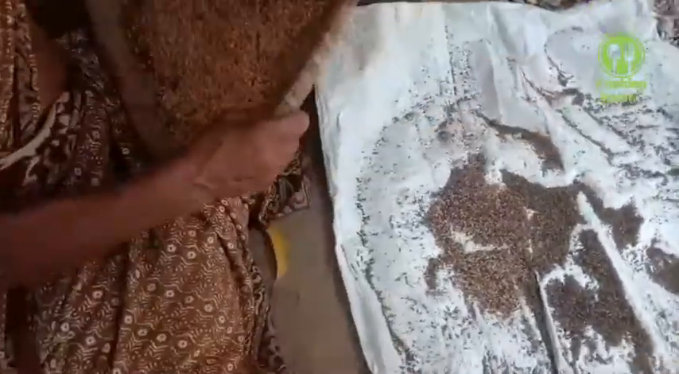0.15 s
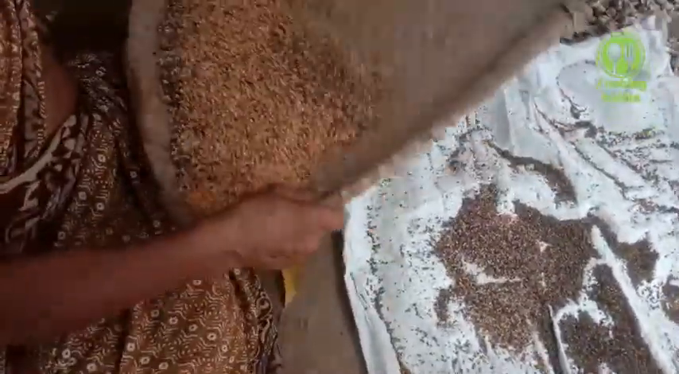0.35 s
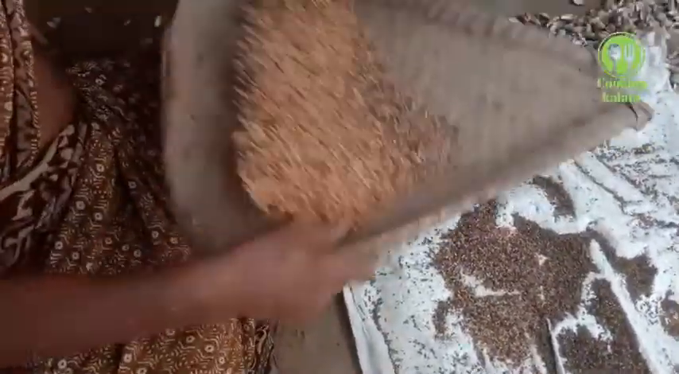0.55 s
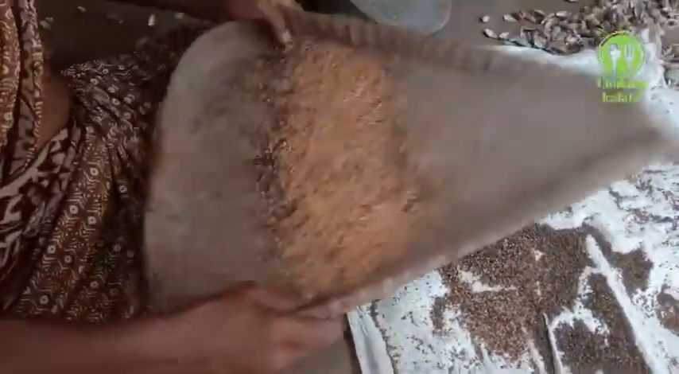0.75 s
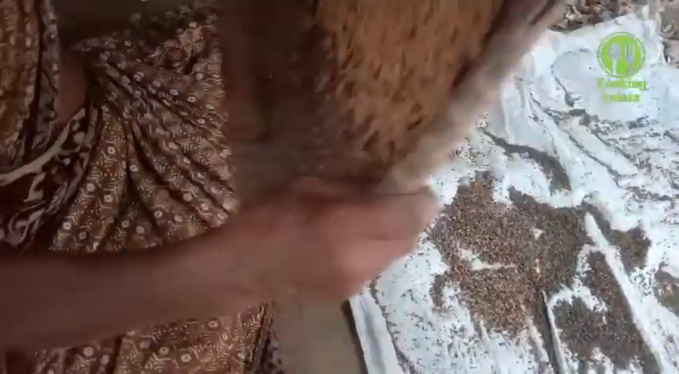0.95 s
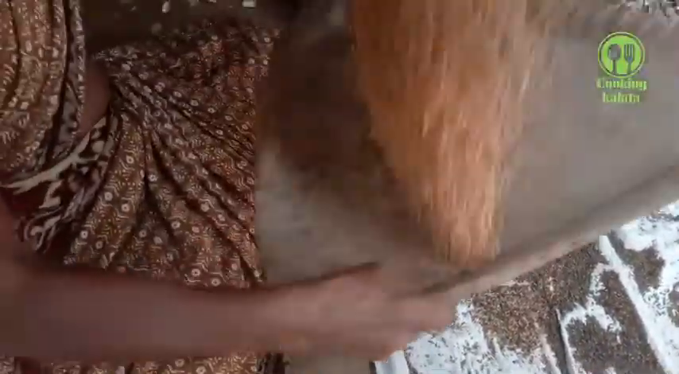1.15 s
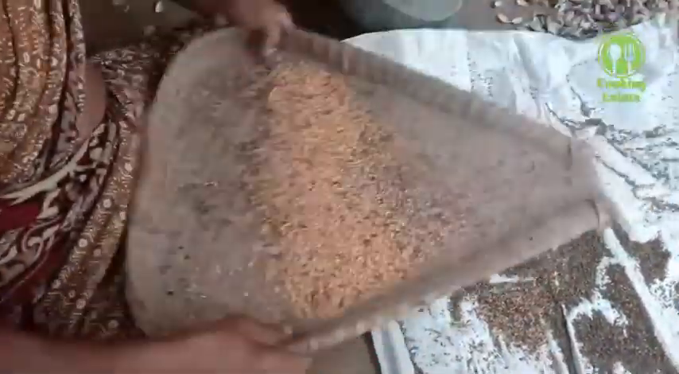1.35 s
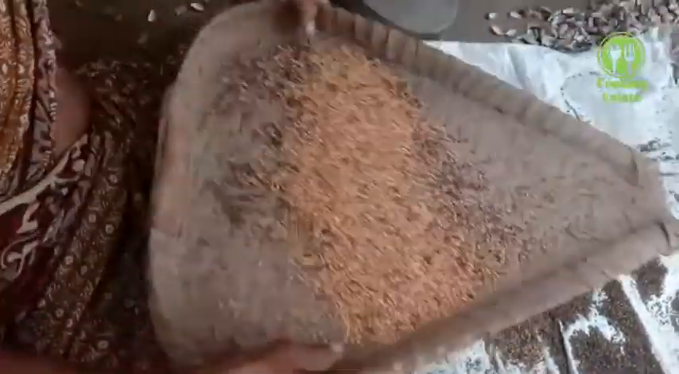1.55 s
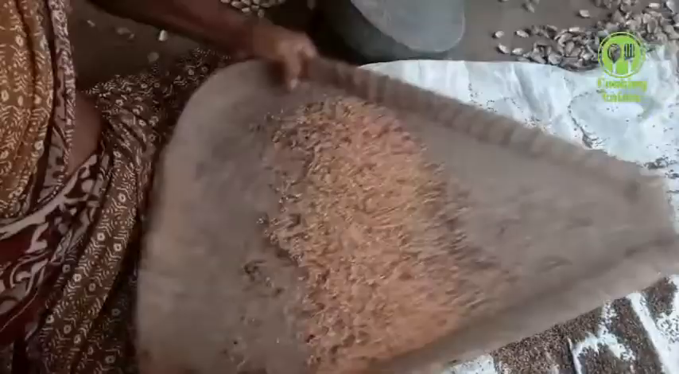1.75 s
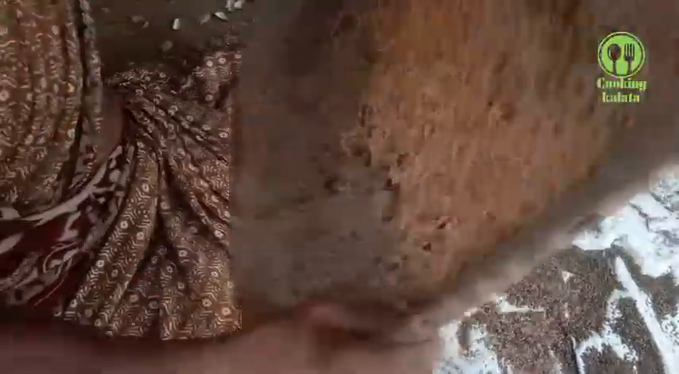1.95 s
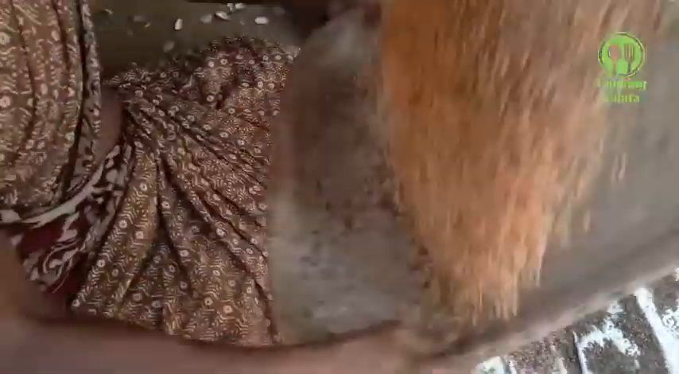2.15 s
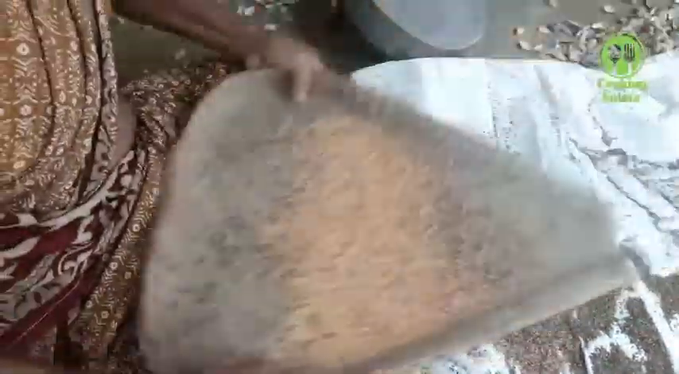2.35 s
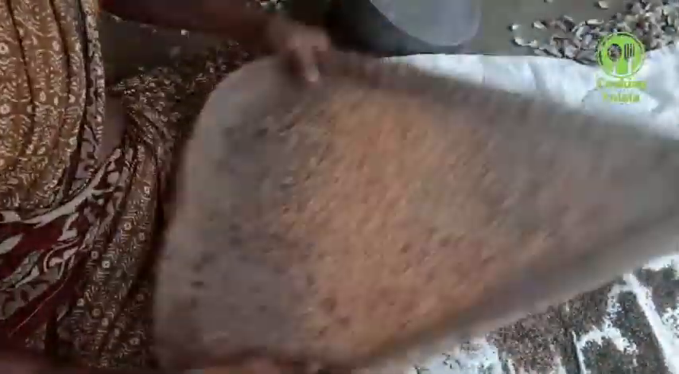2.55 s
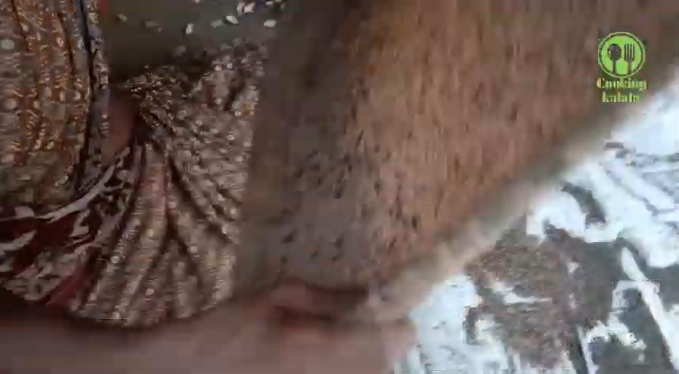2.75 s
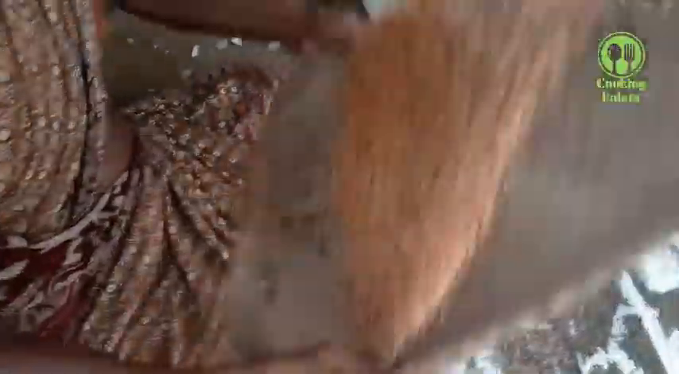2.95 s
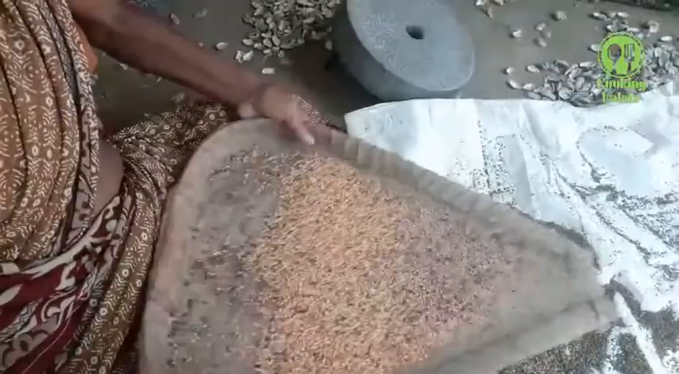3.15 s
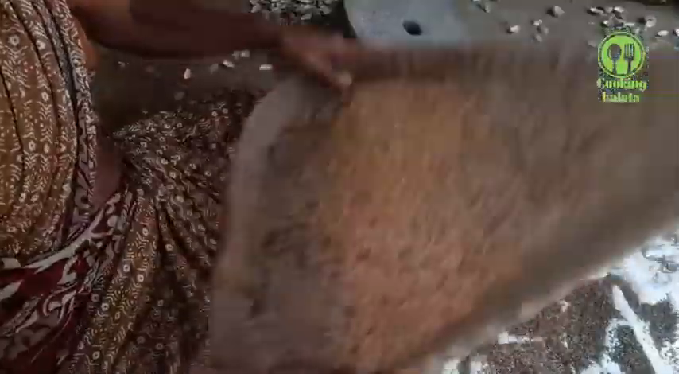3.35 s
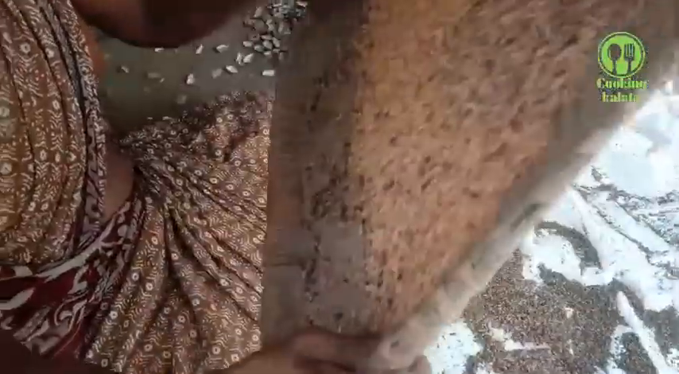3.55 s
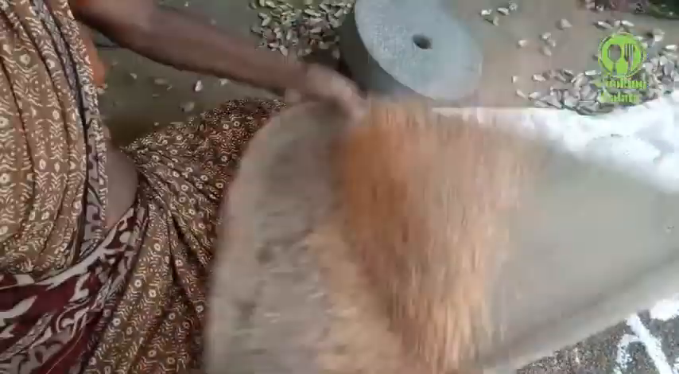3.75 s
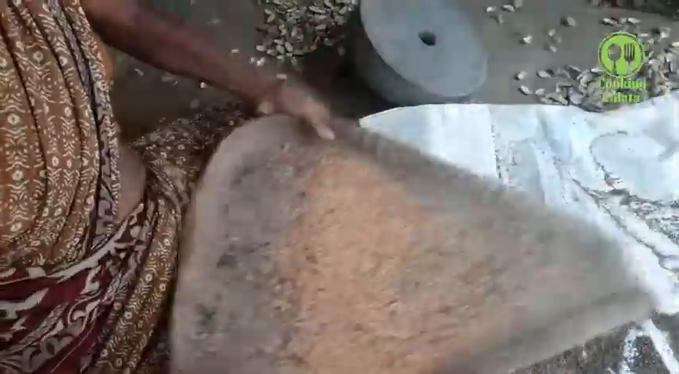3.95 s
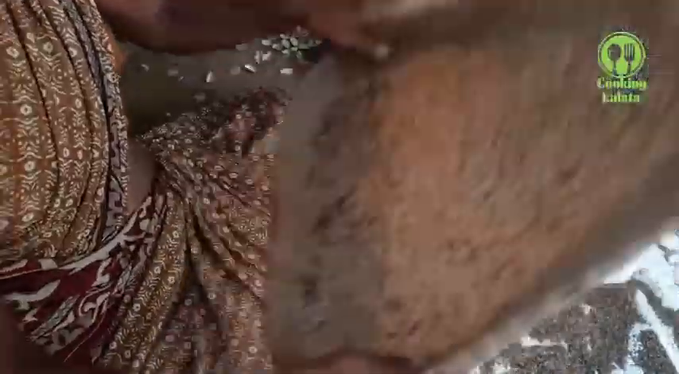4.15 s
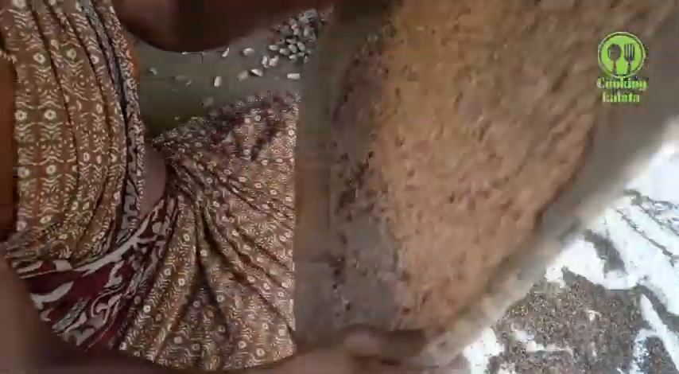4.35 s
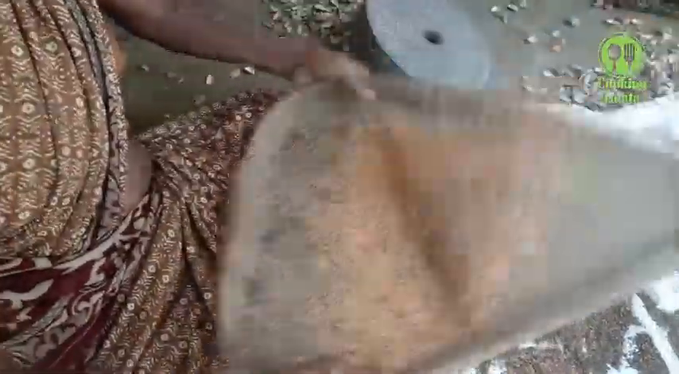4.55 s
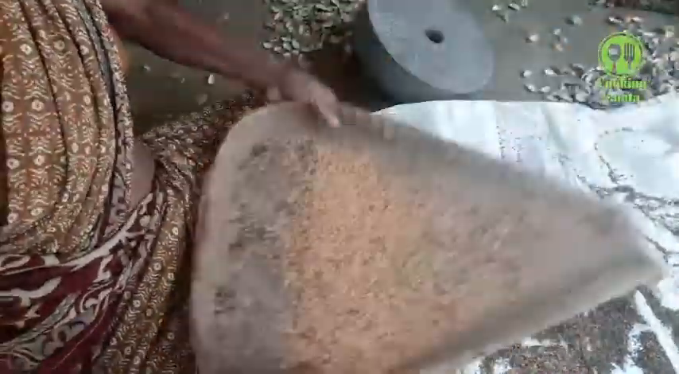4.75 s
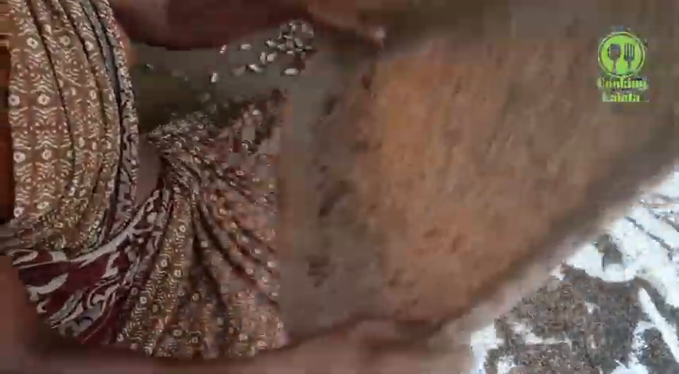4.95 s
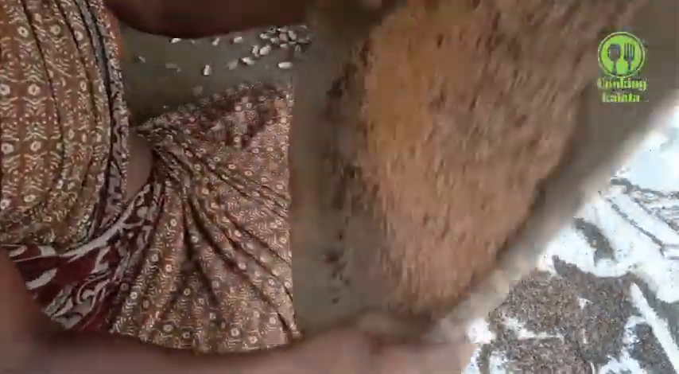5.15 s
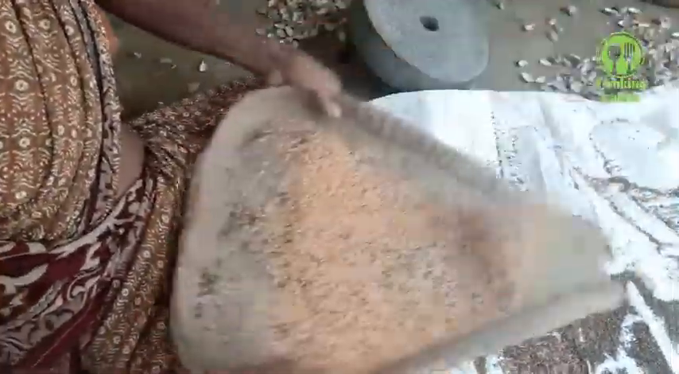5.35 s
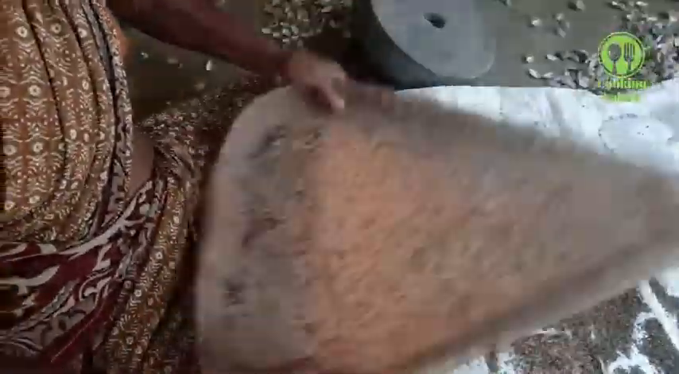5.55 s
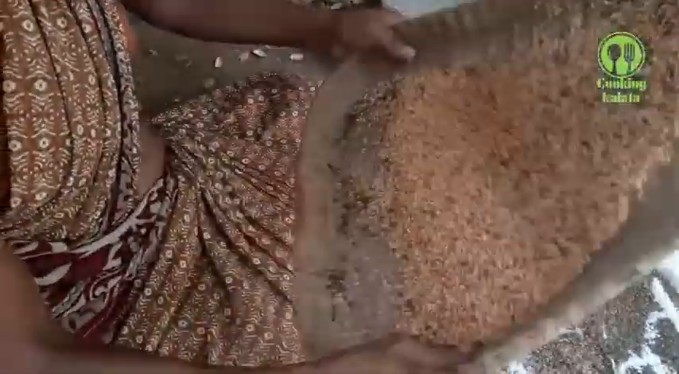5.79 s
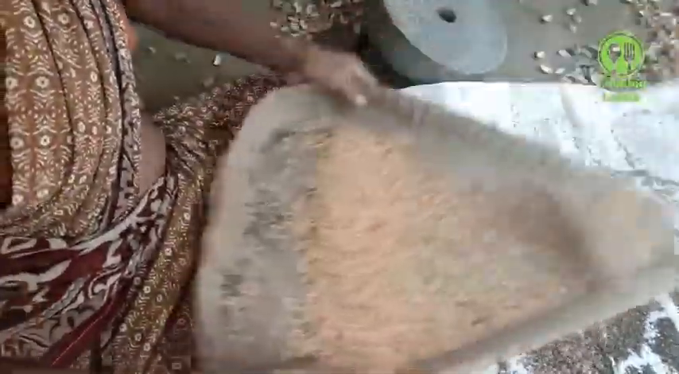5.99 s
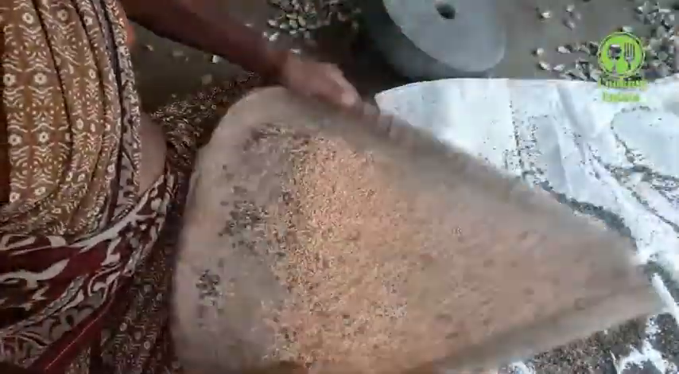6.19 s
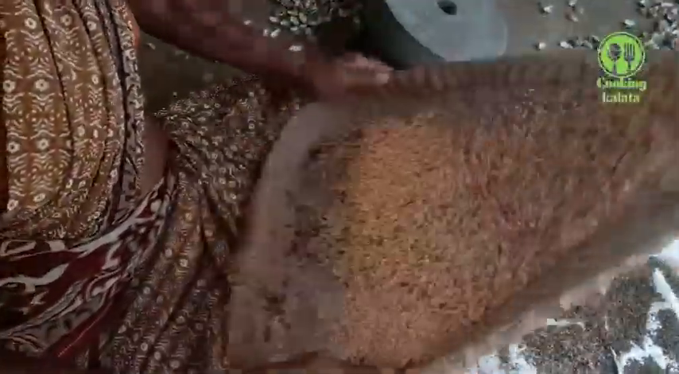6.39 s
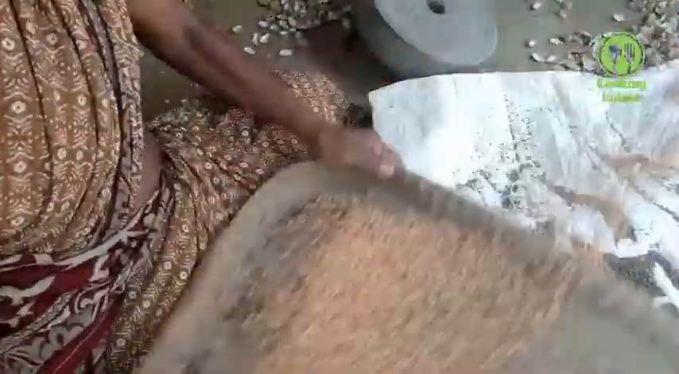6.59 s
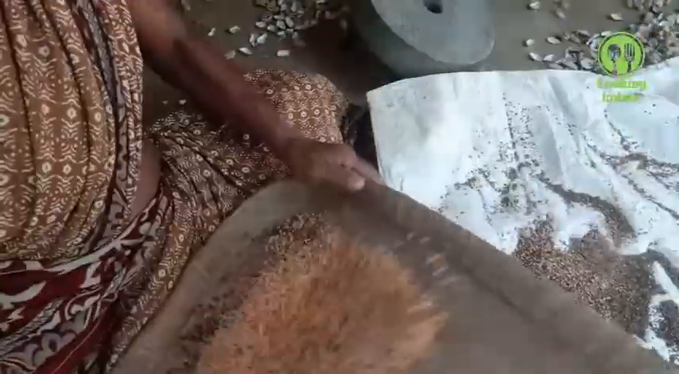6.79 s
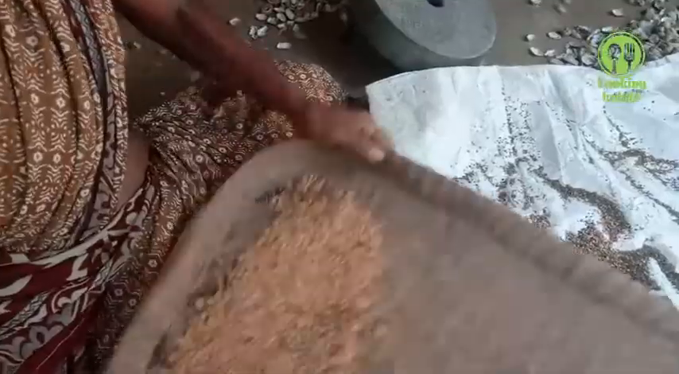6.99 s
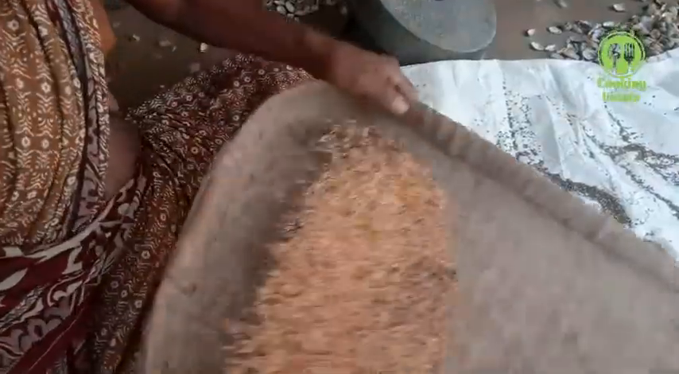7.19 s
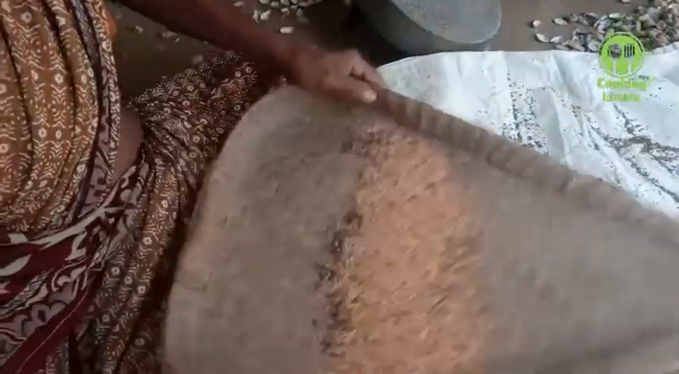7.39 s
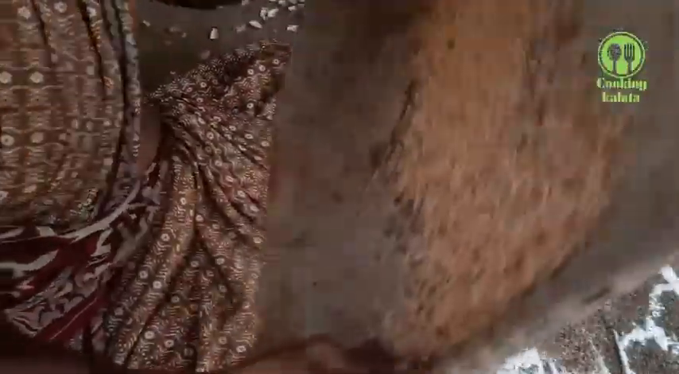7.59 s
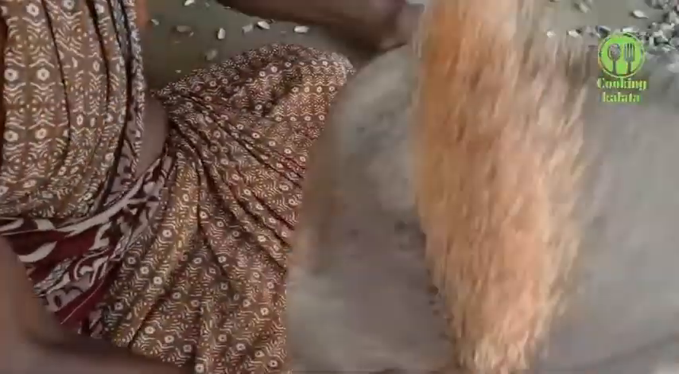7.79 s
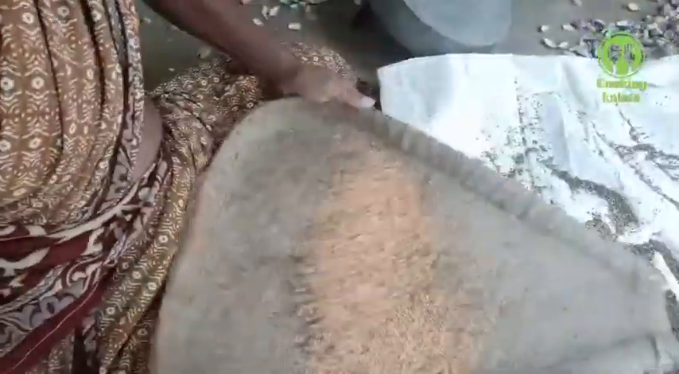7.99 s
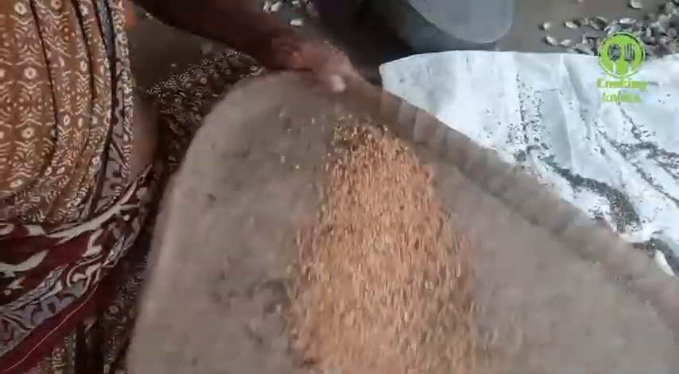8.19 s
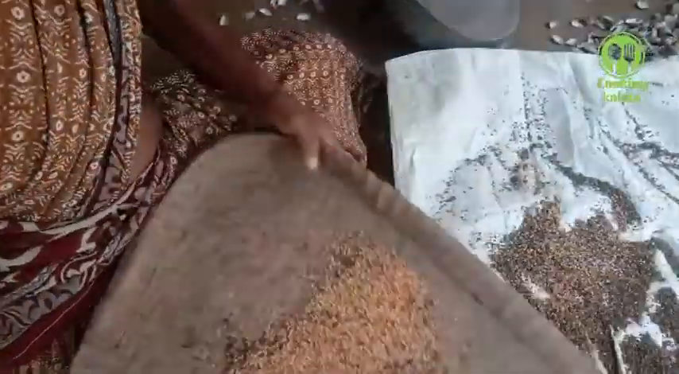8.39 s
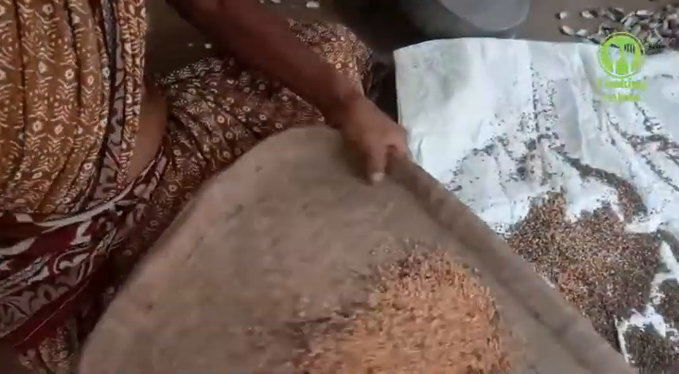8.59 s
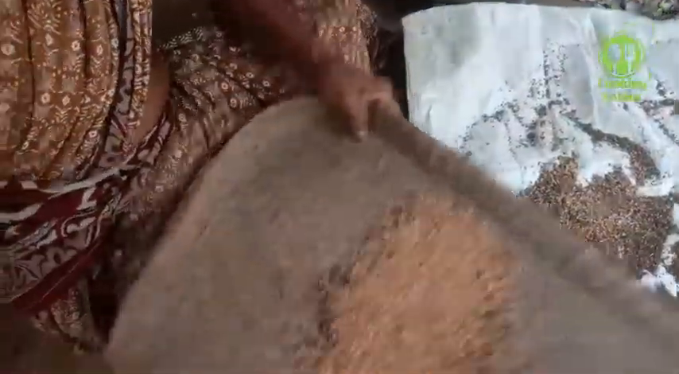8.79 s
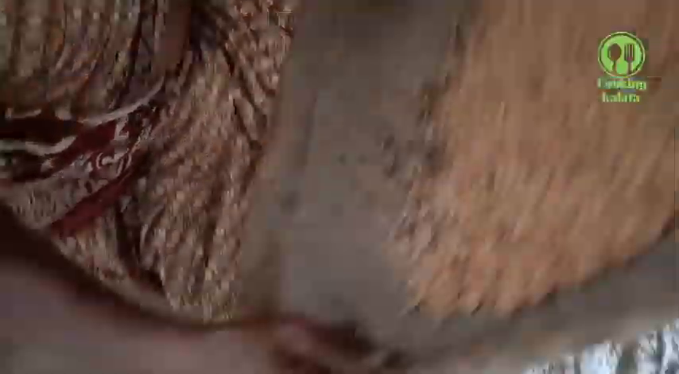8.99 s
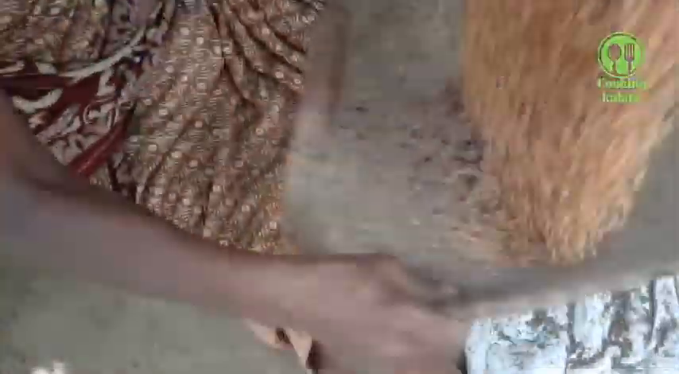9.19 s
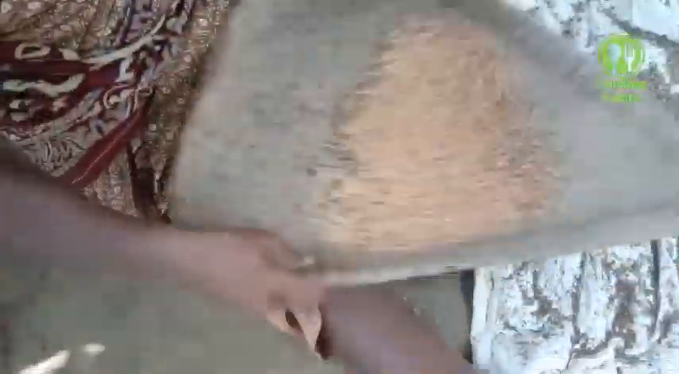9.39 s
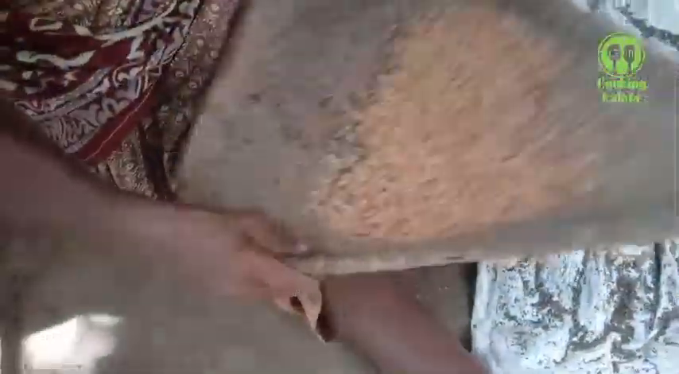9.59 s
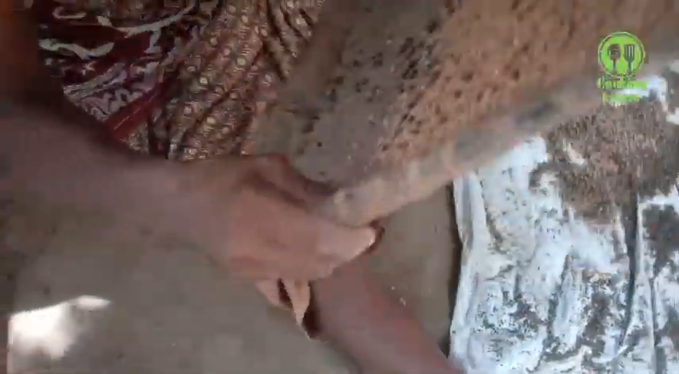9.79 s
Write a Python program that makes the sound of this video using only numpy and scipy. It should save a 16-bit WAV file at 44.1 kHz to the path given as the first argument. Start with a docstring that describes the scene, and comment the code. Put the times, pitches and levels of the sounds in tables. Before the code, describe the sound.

Grain is tossed and caught on a woven tray, making dry, rattling swishes about once or twice a second. Low bumps of a hand on the close microphone mark the opening, mostly on the right. Then four quick bursts of finger taps make the kernels jump. The tossing carries on with stray ticks and ends with two wind puffs and another bump. Very faint birds whistle far off in the quiet yard.

```python
"""A quiet yard, where grain is tossed, caught and shaken on a woven tray while birds whistle far away.
Kernels slide, click together, rattle the strips and drum on the weave, and the tray pushes the air.
Fingers tap the tray from below and make the kernels jump. Close by, a hand bumps a two-microphone
phone, mostly on the right, and wind puffs twice on the left. The left microphone is open and bright;
the right one sits behind a small opening, its port, that rings near 3.7 kHz."""
import sys
import numpy as np
from scipy import signal
from scipy.io import wavfile
from scipy.ndimage import uniform_filter1d

SR = 44100
rng = np.random.default_rng(int(sys.argv[2]) if len(sys.argv) > 2 else 0)


def generate_wav(signal):
    """Clip the signal to [-1, 1] and save it as 16-bit WAV at the path in sys.argv[1]."""
    frames = np.transpose(np.atleast_2d(signal))
    scaled = np.clip(frames, -1, 1) * 32767
    pcm = np.round(scaled).astype(np.int16)
    wavfile.write(sys.argv[1], SR, pcm)


N = 433944


def gain_of(db):
    return 10 ** (np.asarray(db) / 20)


def unit_power(x):
    return x / np.sqrt(np.mean(x ** 2) + 1e-20)


def blur(noise, bins, frames):
    """Smooth noise across pitch and time into drifting patches."""
    return unit_power(uniform_filter1d(uniform_filter1d(noise, bins, axis=0), frames, axis=1))


def values_at(table, hz):
    """Look up a table's columns at the pitches hz."""
    row_hz, *columns = np.transpose(table)
    return np.array([np.interp(np.log(hz + 1), np.log(row_hz + 1), column) for column in columns])


def add(mix, start, sound):
    part = mix[..., round(start * SR):][..., :sound.shape[-1]]
    part += sound[..., :part.shape[-1]]


def tone_filter(db):
    """Turn gains in dB, from 0 Hz to SR / 2, into a filter that rings only after a hit."""
    log = np.log(gain_of(np.maximum(db, -100)))
    log = np.concatenate([log, log[..., -2:0:-1]], -1)
    return np.fft.ifft(np.exp(log - 1j * signal.hilbert(log).imag)).real[..., :1024]


# Surges of grain. Each row: start, rise and hold in seconds, base droop over the hold in dB, base fall
# in dB per second, then levels in dB for five layers: sliding, clicking, strips, drumming, pushed air.
SURGES = [(-0.019, 0.014, 0.055, 6.5, 58.5, -46, -64.5, -54, -58, -69),
          (0.125, 0.17, 0.059, 5, 247, -43, -40, -63, -60, -72),
          (0.459, 0.14, 0.034, 0, 239.5, -40.5, -42.5, -55, -53.5, -70),
          (0.596, 0.11, 0.12, 3.5, 169, -47.5, -52.5, -65, -56.5, -87),
          (1.055, 0.12, 0.12, 5, 374, -30.0, -33.5, -45, -50.5, -66),
          (1.257, 0.084, 0.093, 0.5, 160.5, -49, -54, -65.5, -63, -94.5),
          (1.512, 0.12, 0.041, 1.5, 102, -42, -46, -56.5, -57.5, -72.5),
          (1.687, 0.075, 0.088, 9, 174.5, -45, -49, -57, -58, -70),
          (2.084, 0.12, 0.12, 6, 136.5, -30, -33, -41, -48, -60),
          (2.399, 0.085, 0.15, 17, 211.5, -57.5, -81.5, -71.5, -70.5, -93.0),
          (2.855, 0.006, 0.049, 1, 149, -54.0, -54.5, -62.5, -61, -56),
          (2.914, 0.088, 0.082, 0.5, 187, -31, -32.5, -43.5, -50, -80),
          (3.183, 0.087, 0.044, 4, 72.5, -54.5, -87, -72.5, -88.0, -85),
          (3.63, 0.002, 0.064, 1.5, 49, -47.5, -56, -61.5, -65, -68),
          (3.668, 0.095, 0.099, 1.5, 219, -32.5, -33.5, -43, -50.5, -79),
          (3.887, 0.027, 0.018, 3, 241.5, -38.5, -47.5, -51, -74.5, -94),
          (3.939, 0.082, 0.087, 4.5, 168.5, -55, -95.5, -70.5, -88, -99.5),
          (4.411, 0.0057, 0.12, -4, 187, -46.5, -53.5, -60.5, -65.5, -66),
          (4.419, 0.11, 0.1, 3.5, 211, -34.5, -34, -49.5, -55.5, -86),
          (4.649, 0.063, 0.013, 9, 249, -42, -55, -56.5, -73.5, -87.5),
          (4.754, 0.056, 0.125, 5, 121, -70, -91.5, -89.5, -87.5, -78),
          (5.137, 0.011, 0.084, -8, 137, -53, -62, -62.5, -66, -69.5),
          (5.138, 0.12, 0.15, 1.5, 227, -39, -38.5, -52.5, -60.5, -76.5),
          (5.447, 0.1, 0.11, 5, 92.5, -68, -92, -81.5, -92.5, -104.0),
          (5.775, 0.17, 0.18, 7.5, 190.5, -44.5, -41, -67, -69, -81.5),
          (6.387, 0.16, 0.055, -2, 261.5, -45.5, -42.5, -62, -72, -94.5),
          (6.61, 0.11, 0.069, -5.5, 187.5, -41, -55.5, -47.5, -60, -89),
          (6.763, 0.049, 0.13, -8.5, 255.5, -48.5, -48.5, -63, -64, -79.0),
          (7.112, 0.15, 0.046, 1, 459.5, -38, -39.5, -53, -56.5, -77.0),
          (7.248, 0.073, 0.094, 4.5, 124.5, -48, -51, -60, -62.5, -76),
          (7.644, 0.068, 0.037, 7.5, 321, -65.5, -81, -87, -93, -75),
          (7.738, 0.095, 0.13, 6, 494, -31, -33, -45.5, -50, -63),
          (7.919, 0.049, 0.078, 5, 132.5, -50, -49.5, -63.5, -60, -90),
          (8.226, 0.13, 0.019, 1.0, 379.5, -36.5, -36, -50, -53.5, -68.5),
          (8.396, 0.03, 0.059, 3.5, 68, -55, -58.5, -69.5, -69, -82),
          (8.497, 0.18, 0.18, 4, 182.5, -45.5, -46.5, -58, -63.5, -78),
          (9.118, 0.11, 0.14, 3, 172.5, -32.5, -33.5, -44.5, -53.5, -57),
          (9.666, 0.025, 0.019, 6.5, 251.5, -62.5, -68.5, -75, -88, -88)]
# Those five layers. Each row: exponent of the swell, multiplier of droop and fall, resting level in dB.
LAYERS = [(2.64, 1.049, -92.5), (2.18, 1.25, -105), (3, 0.97, -98), (3.6, 1.02, -94.5), (0.89, .55, -86.5)]
# During a hold the heap spreads and the low layers drain: each layer's extra loss in dB per second.
DRAIN_DB_PER_S = [0.5, -5.5, 15, 24.5, 5]


def surge_levels():
    """Each layer's level in dB: surges swell, hold and fall away, and overlapping ones add in power."""
    t = np.arange(0, N + 132, 132) / SR
    start, rise, hold, droop_db, fall_rate, *peaks_db = np.transpose(SURGES)[:, :, None]
    age = t - start
    held = np.clip(age - rise, 0, hold)
    swell_db = 20 * np.log10(np.clip(age / rise, 1e-4, 1))
    loss_db = droop_db * held / hold + fall_rate * np.maximum(age - rise - hold, 0)
    levels = []
    for peak_db, (curve, speed, rest_db), drain in zip(peaks_db, LAYERS, DRAIN_DB_PER_S):
        power = gain_of(2 * (peak_db + curve * swell_db - speed * loss_db - drain * held)).sum(0)
        levels.append(np.interp(np.arange(N) / SR, t, 10 * np.log10(power + gain_of(2 * rest_db))))
    return levels


def patter(db, most_per_s):
    """Two like streams of hits, one heard by both sides and one only by the right: each is a dense hiss in the
    thick of a toss and thins to single kernels as it dies."""
    per_s = np.clip(most_per_s * gain_of(0.6 * (db - db.max())), 300, SR / 2)
    lands = rng.random((2, N)) < per_s / SR
    size = rng.standard_normal((2, N))
    hits = unit_power(np.sign(size) * gain_of(5 * abs(size))) * lands * np.sqrt(SR / per_s)
    handfuls_db = unit_power(uniform_filter1d(rng.standard_normal(N), size=300))
    return hits * gain_of(handfuls_db)


# How each microphone colours the grain. Each row: pitch in Hz, left gain in dB, right gain in dB.
GRAIN_TONE = [(135, -20, -16), (256, -12.5, -15.5), (477, -1.5, -3), (780, -17, -16.5), (1270, -14, -19.5),
              (1990, -14, -15), (2580, -11.5, -11.5), (3100, -12, -5), (3680, -13.5, 0), (4300, -13, -6.5),
              (4970, -11.5, -10.5), (6760, -13.5, -19.5), (8040, -23.5, -25), (9550, -21.5, -24.5),
              (13000, -16, -58.5), (15200, -16.5, -35.5)]
# How alike the two sides sound. Each row: pitch in Hz, likeness from 0 to 1.
LIKENESS = [(300, 0.93), (1000, .8), (2500, 0.86), (5000, 0.22), (10000, 0.12)]


def at_microphones(hits, other_hits, low_hz, high_hz):
    """One band of the grain; the right side hears it a little later and partly from other kernels."""
    hz = np.fft.rfftfreq(2048, 1 / SR)
    band_db = -10 * np.log10((1 + (low_hz / (hz + 1)) ** 10) * (1 + (hz / high_hz) ** 10))
    left_db, right_db = values_at(GRAIN_TONE, hz) + band_db
    alike = values_at(LIKENESS, hz)[0]
    shared = tone_filter(right_db + 20 * np.log10(alike))
    own = tone_filter(right_db + 10 * np.log10(1 - alike ** 2))
    left = signal.oaconvolve(hits, tone_filter(left_db))
    right = signal.oaconvolve(np.roll(hits, 3), shared) + signal.oaconvolve(other_hits, own)
    return np.array([left[:N], right[:N]])


# The weave's resonances. Each row: pitch in Hz, width in Hz, boost in dB under the fullest load.
WEAVE_MODES = [(431, 39, -4), (550, 70, 0.5), (886, 72, 0.5), (940, 67, 2.5), (1416, 79, 5)]
# Grain sliding thinly has less bass than a heap. Each row: time in seconds, bass loss in dB per octave.
BASS_LOSS = [(0, 1.5), (5.6, -5), (6.4, 9), (7.05, 14), (7.2, -4.5), (8.6, -1), (9.84, 0)]


def loaded_weave(sound, load_db):
    """The loaded weave keeps changing which pitches it favours: narrow streaks and broad patches."""
    hz, t, spectrum = signal.stft(sound, SR, nperseg=512, noverlap=384)
    hz = hz[:, None]
    light_db = np.interp(t, np.arange(N) / SR, load_db.max() - load_db)  # grows as the tray empties
    streaks, patches = rng.standard_normal((2,) + spectrum.shape[:0:-1]).transpose(0, 2, 1)
    streaks = unit_power(uniform_filter1d(uniform_filter1d(streaks, 30, axis=1), 20, axis=1))
    streaks *= 0.6 + 0.04 * np.minimum(light_db, 35)  # few kernels ring clearer
    drift_db = 2 * streaks + 2.01 * blur(patches, bins=8, frames=24)
    drift_db *= 1 - 0.5 * np.clip(np.log2((hz + 1) / 4000), 0, 1)  # the treble pours more evenly
    modes_db = sum(db / (1 + (2 * (hz - pitch) / width) ** 2) for pitch, width, db in WEAVE_MODES)
    bass_slope = 0.22 * light_db + np.interp(t, *np.transpose(BASS_LOSS))  # a light load loses bass
    thin_db = -bass_slope * np.clip(np.log2(680 / (hz + 1)), 0, 2)
    dull_db = -0.2 * light_db * np.clip(np.log2((hz + 1) / 4300), 0, 0.6)  # slow kernels sound duller
    spectrum *= gain_of(drift_db + modes_db * (1 + 0.043 * light_db) + thin_db + dull_db)
    return signal.istft(spectrum, nperseg=512, noverlap=384)[1][:, :N]


def tossed_grain():
    """Kernels slide, click, rattle the strips and drum, over a low puff of air pushed by the tray."""
    slide_db, click_db, strips_db, drum_db, air_db = surge_levels()
    shower = np.zeros((2, N))
    for db, low_hz, high_hz, most_per_s in ((slide_db, 1950, 7300, 30000), (click_db, 7300, 18000, 40000),
                                            (strips_db, 850, 1950, 15000), (drum_db, 260, 850, 10000)):
        layer = at_microphones(*patter(db, most_per_s), low_hz, high_hz)
        layer *= gain_of(db) / np.sqrt(np.mean(layer.mean(0) ** 2))
        if db is click_db:  # the right side's treble fades away faster as the clicking gets quieter
            layer[1] *= gain_of(0.33 * (db - db.max()))
        shower += layer
    air_band = signal.butter(2, [35, 150], "band", fs=SR, output="sos")
    air = unit_power(signal.sosfilt(air_band, rng.standard_normal((2, N))))
    return loaded_weave(shower, drum_db) + air * gain_of(air_db + [[0], [-1.5]])


# The hush of the yard. Each row: pitch in Hz, relative left and right levels in dB.
AIR_TONE = [(39.4, -113.1, -106.1), (105, -108.3, -102.5), (238, -111.7, -109.8), (500, -112.8, -112.1),
            (1018, -114.5, -111.9), (2000, -113.6, -113.2), (2900, -111.0, -107.3), (3600, -114.2, -103.2),
            (4260, -114.0, -110.4), (6460, -118.7, -121.4), (9000, -126.4, -126.8), (15000, -127.8, -129.8)]


def yard_air():
    """Faint air with drifting patches, partly shared by both microphones."""
    frames, hz = N // 256 + 5, np.fft.rfftfreq(1024, 1 / SR)
    left_re, left_im, own_re, own_im, patches = rng.standard_normal((frames, 513, 5)).T
    left = left_re + 1j * left_im
    right = 0.5 * left + np.sqrt(0.75) * (own_re + 1j * own_im)
    tone_db = values_at(AIR_TONE, hz)
    spectrum = np.array([left, right]) * gain_of(tone_db[:, :, None] + blur(patches, bins=10, frames=12))
    air = signal.istft(spectrum, nperseg=1024, noverlap=768)[1][:, :N]
    power = np.mean(gain_of(2 * tone_db)) * SR / 2
    return gain_of(-1.5) * unit_power(air) * np.sqrt(power)


# Low thumps on a microphone: hand bumps, and two puffs of wind on the left near 9.3 s. Each row: time
# in seconds, relative level in dB, slowness and softness in milliseconds, side (0 is left, 1 is right).
THUMPS = [(0.098, -45.5, 2.5, 0.43, 1), (0.1141, -29.5, 2.1, 0.66, 1), (0.1334, -47, 6.6, 0.2, 1),
          (0.142, -38, 1.1, 0.6, 0), (0.155, -33.5, 0.72, 0.7, 1), (0.63, -36.5, 3.3, 0.18, 1),
          (0.717, -51, 9.3, 0.44, 1), (0.73, -30, 3.1, 0.43, 1), (0.767, -46, 3, 0.22, 1),
          (0.784, -36, 3.5, 0.99, 1), (0.8305, -49.5, 2.9, 0.33, 1), (0.8436, -35.5, 3.15, 0.29, 1),
          (1.0595, -64, 2.5, 0.4, 1), (1.772, -45.5, 1.06, 0.32, 1), (1.8762, -30, 4.6, 0.65, 1),
          (1.9229, -29.5, 1.75, 0.31, 1), (1.9319, -44, 5.7, 0.58, 1), (1.9945, -31, 3.9, 0.17, 1),
          (2.0664, -43, 3.4, 0.63, 1), (2.0742, -38, 2.5, 0.79, 1), (2.1127, -32, 3.5, 0.21, 1),
          (2.134, -34, 5.1, 0.28, 1), (2.1663, -40, 5.1, 0.4, 1), (2.35, -52, 3.3, 0.4, 1),
          (2.3677, -31, 2.3, 0.32, 1), (2.4327, -46, 1.8, 0.35, 1), (2.4452, -42, 0.94, 0.32, 1),
          (3.387, -68.5, 1.3, 0.37, 1), (4.0183, -36, 3.1, 0.96, 1), (6.5781, -56, 0.81, 0.15, 1),
          (7.755, -62, 5.8, 0.4, 1), (7.77, -49, 6.6, 0.66, 1), (7.783, -58, 4.9, 0.37, 1),
          (7.796, -50.5, 8.5, 0.4, 1), (7.962, -42, 1.4, 0.24, 1), (9.0, -66, 1.73, 0.38, 1),
          (9.273, -40.5, 3.6, 1, 0), (9.3607, -50.5, 4.9, 0.4, 0), (9.6742, -43, 3.4, 0.22, 1),
          (9.6837, -34.5, 0.97, 0.35, 1), (9.686, -37.5, 2, 0.24, 1), (9.701, -35.5, 2.9, 0.23, 1)]


def microphone_thumps():
    """The microphone's thin skin is shoved: it snaps, swings back ever more slowly and trembles."""
    out, ms = np.zeros((2, N)), np.arange(3500) / SR * 1000
    snap_hz, rumble_band = 1300, signal.butter(2, [40, 220], "band", fs=SR)
    for time, db, slow_ms, soft_ms, side in THUMPS:
        age = ms / slow_ms
        swing = np.sin(2 * np.pi * 1.05 * (age + 1e-9) ** 0.52)
        swing *= (1 - np.exp(-age / 0.12)) * np.exp(-age / 1.94)
        cushion = np.hanning(round(soft_ms * SR / 500) + 3)  # a soft push rounds the edge
        swing = np.convolve(swing, cushion / cushion.sum())[:len(ms)]
        snap = np.sin(2 * np.pi * snap_hz * ms / 1000) * (1 - np.exp(-ms / 2.7))
        snap *= gain_of(17 - 45 * soft_ms - 60 * ms / 6)
        tremble = unit_power(signal.lfilter(*rumble_band, rng.standard_normal(len(ms))))
        tremble *= gain_of(-18.5 - 60 * ms / 130)
        add(out[side], time - soft_ms / 1000, gain_of(db + 14.5) * (swing + snap + tremble))
    return signal.sosfilt(signal.butter(2, 28, "high", fs=SR, output="sos"), out)


# Single kernels landing. Each row: start in seconds, relative level in dB.
STRAY_KERNELS = [(0.9497, -39), (2.0735, -35.5), (2.481, -47), (2.542, -42), (2.5691, -42), (2.607, -45),
                 (2.6309, -41), (2.6774, -44), (3.3052, -33), (3.3892, -46), (3.4541, -45), (4.9044, -54),
                 (4.9477, -54), (5.7506, -51), (5.7793, -54), (7.51, -36), (7.534, -44), (7.5725, -36),
                 (7.6879, -52), (7.6994, -43), (7.703, -38), (9.0059, -44), (9.0914, -52), (9.1074, -52),
                 (9.128, -54)]


def stray_kernels():
    """A lone kernel ticks: a dry click on both sides, plus a short ring of the port on the right."""
    out, t = np.zeros((2, N)), np.arange(400) / SR
    port_hz, weave_hz, husk_hz = 3750, 2300, 5400
    ring = gain_of(-60 * t / 0.009) * np.sin(2 * np.pi * port_hz * t)
    click = np.sin(2 * np.pi * weave_hz * t) + np.sin(2 * np.pi * husk_hz * t)
    click *= gain_of(-60 * t / 0.0015)
    tick = np.array([gain_of(-5) * click, gain_of(1.5) * (ring + click)]) * (1 - np.exp(-t / 0.00048))
    for start, db in STRAY_KERNELS:
        add(out, start, gain_of(db) * tick)
    return out


# Bird notes. Each row: start and length in seconds, first and last pitch in Hz, relative level in dB.
BIRD_NOTES = [(2.558, 0.26, 3920, 3760, -70.5), (3.47, 0.078, 4125, 2220, -59),
              (3.473, 0.066, 3640, 3140, -59), (4.885, 0.037, 3470, 3250, -67),
              (5.599, 0.019, 3600, 3930, -61), (5.64, 0.07, 3480, 3300, -73),
              (9.008, 0.25, 3525, 3170, -68.5)]


def far_birds():
    """Gliding, wavering whistles off to the right, smeared by the yard's echo."""
    out = np.zeros(N)
    for start, length, first_hz, last_hz, db in BIRD_NOTES:
        progress = np.linspace(0, 1, round(length * SR))
        hz = first_hz + (last_hz - first_hz) * progress
        waver = gain_of(2.1 * unit_power(uniform_filter1d(rng.standard_normal(len(hz)), size=200)))
        swell = np.sin(np.pi * progress ** 0.45) ** 2
        add(out, start, gain_of(db) * waver * swell * np.sin(2 * np.pi * np.cumsum(hz) / SR))
    echo = rng.standard_normal(4000) * gain_of(-26.5 - 60 * np.arange(4000) / SR / 0.13)
    return (out + signal.oaconvolve(out, echo)[:N]) * gain_of([[-4], [4]])


# Fingers under the tray, played by the next two functions. Each row: time in seconds, level of the
# blow in dB, pitch of the dent in Hz, relative boost of the jumping kernels in dB.
TAPS = [(2.8586, -32.5, 362, 5.5), (2.869, -21.5, 285, -1.5), (2.884, -26, 320, -6),
        (2.8939, -29, 239, -21), (3.6337, -29, 355, 6.5), (3.6479, -19.5, 288, -3),
        (3.6644, -27, 321, -3.5), (3.6753, -32, 142, -11), (4.396, -47, 330, 8.5), (4.406, -27, 342, 4),
        (4.4185, -21.5, 323, -8), (4.4357, -25, 312, -4), (4.44, -32, 306, -5.5), (5.1399, -34, 352, 4.5),
        (5.1533, -25.5, 301, -2.5), (5.1714, -33.5, 264, -3)]


def jumping_kernels():
    """Kernels stir as the tray starts to move just before each tap, then jump and rattle at the blow."""
    hits, t = np.zeros(N), np.arange(2200) / SR
    stir_s = 0.025
    stir = gain_of(-24.5) * np.minimum(t / 0.008, 1) * (t < stir_s)
    rattle = gain_of(-60 * t / 0.017) + gain_of(-10 - 60 * t / 0.11)
    for time, db, _, jump_db in TAPS:
        add(hits, time - 0.0015, gain_of(db + jump_db) * rattle * rng.standard_normal(len(t)))
        add(hits, time - stir_s, gain_of(db) * stir * rng.standard_normal(len(t)))
    other_hits = hits * rng.choice([-1., 1.], N)
    return gain_of(8.5) * at_microphones(hits, other_hits, low_hz=650, high_hz=18000)


def finger_taps():
    """Each tap dents the damped weave once; it rings faintly and the whole tray sways low."""
    out, t = np.zeros(N), np.arange(-200, 3000) / SR
    after = np.maximum(t, 0)
    sway = gain_of(-26.5 - 60 * after / 0.21) * np.sin(2 * np.pi * 75 * after)
    for time, db, hz, _ in TAPS:
        dent = -np.cos(2 * np.pi * hz * t) * np.exp(-(1.71 * hz * t) ** 2)
        ring = gain_of(-20 - 60 * after / 0.16) * np.sin(2 * np.pi * 1.3 * hz * after)
        add(out, time + t[0], gain_of(db) * (dent + ring + sway))
    return out * gain_of([[0], [-3]])


# A fingernail on the right port. Each row: time in seconds, relative level in dB, pitch in Hz.
NAIL_TICKS = [(9.6879, -27.5, 6100), (9.7028, -35, 5530)]


def nail_ticks():
    """A fingertip brushes past the right port just before its nail ticks on it."""
    out, ms = np.zeros((2, N)), np.arange(3500) / SR * 1000
    skin_band = signal.butter(2, [500, 5000], "band", fs=SR)
    for time, db, hz in NAIL_TICKS:
        tick = np.sin(2 * np.pi * hz * ms / 1000) * (1 - np.exp(-ms / 0.13))
        add(out[1], time, tick * gain_of(db + 11 - 60 * ms / 2.1))
        brush = signal.lfilter(*skin_band, rng.standard_normal(len(ms)))
        add(out[1], time - 0.012, brush * gain_of(-42.5 - 60 * ms / 120))
    return out


def scene():
    """The sounds of the tray, the phone and the yard, added together."""
    tray = tossed_grain() + jumping_kernels() + stray_kernels() + finger_taps()
    return tray + microphone_thumps() + nail_ticks() + far_birds() + yard_air()


def record(dry):
    """Cut away the very highest treble."""
    cutoff_hz = 15750
    low_pass = signal.firwin(511, cutoff_hz, window=("kaiser", 11), fs=SR)
    return signal.oaconvolve(dry, low_pass[None], "same")


dry = scene()
out = record(dry)
generate_wav(out)
```